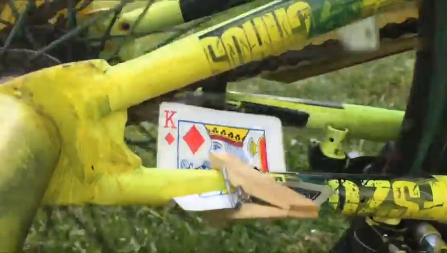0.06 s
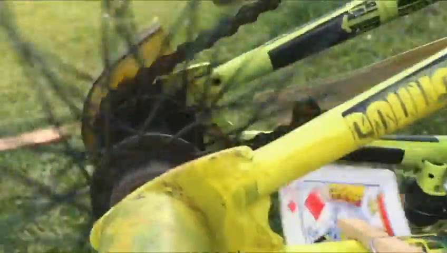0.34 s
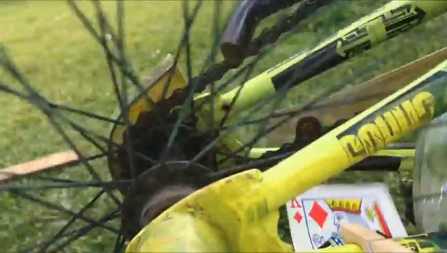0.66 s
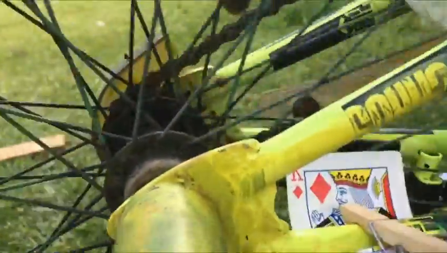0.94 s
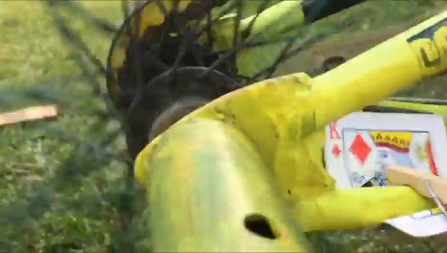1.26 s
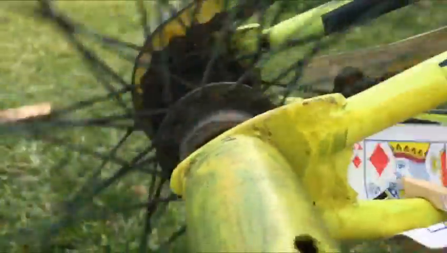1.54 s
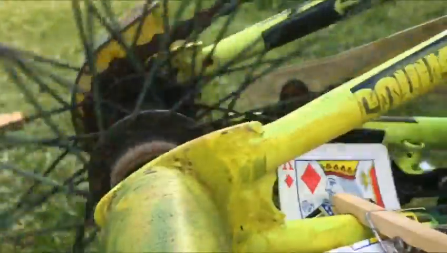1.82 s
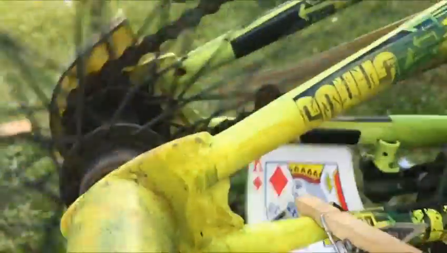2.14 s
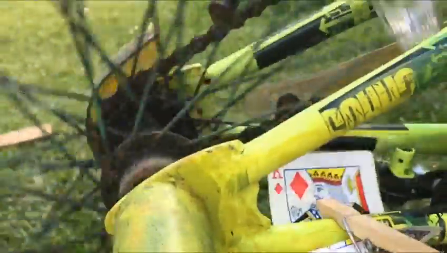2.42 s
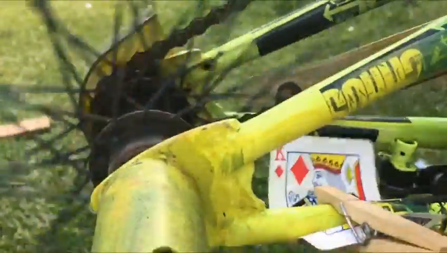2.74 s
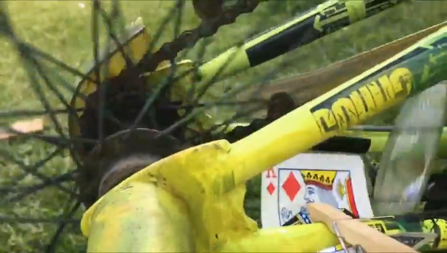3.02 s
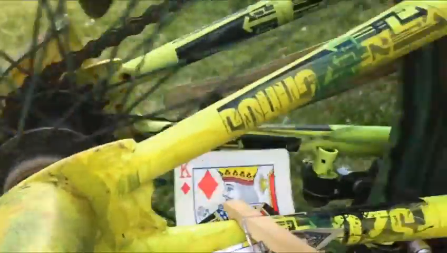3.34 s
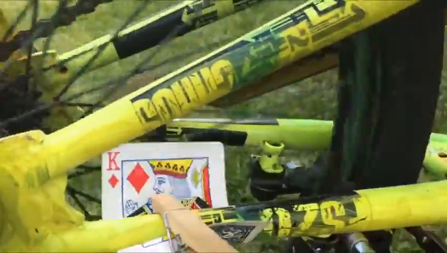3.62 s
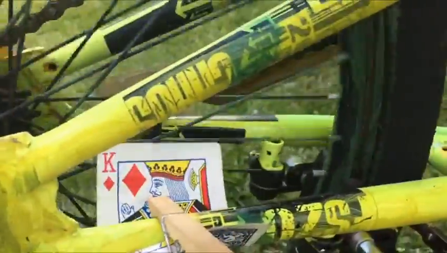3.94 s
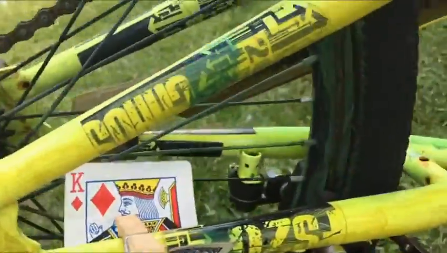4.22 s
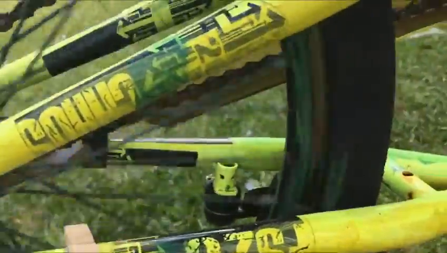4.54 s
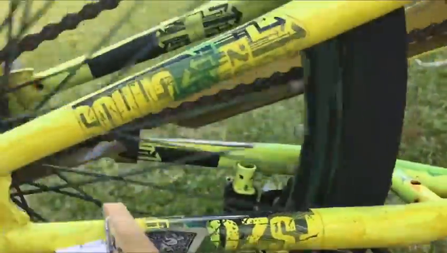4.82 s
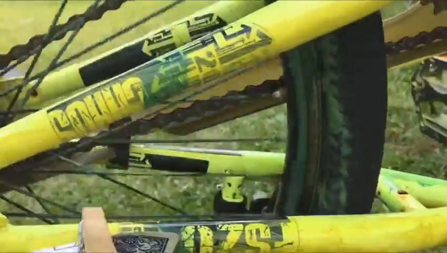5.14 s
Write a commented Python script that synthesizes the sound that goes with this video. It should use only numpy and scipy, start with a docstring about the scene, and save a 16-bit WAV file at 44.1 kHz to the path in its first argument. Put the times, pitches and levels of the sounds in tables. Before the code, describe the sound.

A playing card pegged to a bicycle is slapped by the spokes of the turning wheel, close to the microphone. The crisp clicks speed up, slow to a brief pause, then run again in several surges before slowing to a stop. A few early snaps puff air at the microphone. At the end the drive clanks sharply and the chain ticks and rustles softly over the sprocket. The outdoor background is very quiet.

```python
"""A playing card is pegged to a bicycle on a lawn, and the back wheel is turned in a few pushes.
Each spoke meets the card, scrapes to its edge and lets it snap free; the card flutters for a few swings.
Some early snaps fan a puff of air at the microphone. The wheel rests briefly at one second, turns again,
then slows and stops at about four seconds. Last, the drive clanks, the frame thuds and the chain
creeps over the sprocket (the toothed wheel), link by link."""
import sys
import numpy as np
from scipy import signal
from scipy.fft import rfft, irfft, next_fast_len
from scipy.io import wavfile
from scipy.ndimage import uniform_filter1d

SR = 44100
rng = np.random.default_rng(int(sys.argv[2]) if len(sys.argv) > 2 else 0)


def dump(signal):
    """Clip the signal to [-1, 1] and save it as 16-bit WAV at the path in sys.argv[1]."""
    limited = np.clip(np.atleast_2d(signal).T, -1, 1)
    pcm = np.round(limited * 32767).astype(np.int16)
    wavfile.write(sys.argv[1], SR, pcm)


N = 232444
TIME = np.arange(N) / SR     # seconds since the scene began
AGE = np.arange(4096) / SR   # seconds since one short sound began
FAST_GAP_S, COAST_GAP_S, SLOW_GAP_S = .051, .06, .13   # between spokes: pushed hard, coasting, crawling

# The snaps grow brighter or duller as the hand-held microphone drifts.
# Each row: time in seconds, treble tilt in dB per octave.
BRIGHTNESS = [(.25, 0.24), (.9, -0.5), (1.4, 0.86), (1.9, -0.06), (2.5, -0.07), (2.9, 0.16), (3.2, 0),
              (3.9, -0.7)]
# The card leaves a spoke. Each row: start in seconds, level in dB, ring of the bent card in Hz.
SLAPS = [(0.1695, -9.5, 2830), (0.2461, -2.5, 4640), (0.296, -3, 4330), (0.3391, -4.5, 4300),
         (0.38, -3.5, 4300), (0.4209, -4, 4340), (0.462, -4.5, 4640), (0.5036, -4.5, 4290),
         (0.5549, -4.5, 4470), (0.619, -7, 5300), (0.7004, -9, 3280), (0.7896, -10, 4000),
         (0.9209, -16, 3570), (1.1999, -12, 3730), (1.2892, -4, 6000), (1.3404, -3, 4010),
         (1.3797, -2.5, 3990), (1.4166, -4.5, 3800), (1.4532, -4.5, 4060), (1.4901, -4, 4020),
         (1.5325, -5.5, 3860), (1.5803, -6.5, 4100), (1.6347, -6.5, 2170), (1.6918, -5.5, 3900),
         (1.7564, -5.5, 4450), (1.8311, -5.5, 6000), (1.9062, -5, 4620), (1.9838, -5.5, 4650),
         (2.0699, -8.5, 3050), (2.17, -5.5, 4600), (2.2244, -4, 4530), (2.2652, -3.5, 4320),
         (2.3059, -5, 4570), (2.3509, -6.5, 4660), (2.4007, -6, 2230), (2.452, -6, 2130),
         (2.5073, -5.5, 2230), (2.5681, -5.5, 4670), (2.6282, -5, 4600), (2.6908, -4, 4500),
         (2.7573, -5.5, 4560), (2.825, -5, 4640), (2.8714, -3.5, 4580), (2.9105, -3, 4370),
         (2.9559, -5.5, 4600), (3.009, -6, 4580), (3.0725, -7.5, 3100), (3.1396, -5.5, 2260),
         (3.2183, -8, 3250), (3.3159, -8, 2200), (3.415, -10.5, 3320), (3.5197, -11, 2980),
         (3.6453, -13.5, 3300), (3.7834, -13.5, 2760), (3.932, -14.5, 3230)]

def card_slaps():
    """The card slips off each spoke, snaps and flutters. A slow spoke drags longer and cracks less."""
    out = np.zeros(N)
    for (start, db, ring_hz), gap in zip(SLAPS, spoke_gaps()):
        slow = np.clip((gap - COAST_GAP_S) / (SLOW_GAP_S - COAST_GAP_S), 0, 1)
        fast = np.clip((COAST_GAP_S - gap) / (COAST_GAP_S - FAST_GAP_S), 0, 1)
        doublings = np.log2(COAST_GAP_S / min(gap, SLOW_GAP_S))   # of the coasting speed
        tilt = np.interp(start, *np.transpose(BRIGHTNESS)) + doublings   # faster is brighter
        snap_at = start + .0008 + .0007 * slow
        snap_db = db + 9.5 + 2.75 * slow
        drag_s = .0024 + .0026 * slow
        add(out, snap_at - drag_s, from_db(snap_db - 17.5 + 14 * slow) * slip(drag_s, tilt))
        add(out, snap_at, snap(snap_db, ring_hz, tilt, slow))
        rebound_db = snap_db - 15 + 5.5 * fast + 8 * slow   # a fast spoke throws the card back harder
        add(out, snap_at, flutter(rebound_db, tilt, slow, doublings))
        add(out, snap_at - drag_s / 2, sway())
    return out

def spoke_gaps():
    """Seconds between spokes at each slap."""
    return np.gradient([0] + [row[0] for row in SLAPS])[1:]

# Tone of the slipping edge. Each row: frequency in Hz, relative level in dB.
SLIP_TONE = [(60, -15.5), (450, -15.5), (850, -2.5), (1300, -6.5), (2300, -1), (3800, -0.5), (6000, -19),
             (9000, -14), (10300, -26), (11500, -16.5), (15500, -20.5)]

def slip(drag_s, tilt):
    """The card's edge scrapes off the spoke, growing louder until it lets go."""
    fade_in = np.clip(AGE / .00035, 0, 1)
    fade_out = np.clip((drag_s - AGE) / .00023, 0, 1)
    return colour(grit(fade_in * fade_out * (1 + AGE / drag_s)), SLIP_TONE, tilt / 2)

# Tone of the snap. Each row: frequency in Hz, relative level in dB.
SNAP_TONE = [(60, -14.5), (250, -13.5), (440, -17), (590, -4.5), (780, -3), (1020, -3), (1350, -15),
             (2200, 1), (3200, -3.5), (4500, 1), (6500, -3), (9300, -7), (10300, -15), (11200, -8),
             (15500, -15)]

def snap(db, ring_hz, tilt, slow):
    """The freed card rings and shoves the air; its two corners crack loose a moment apart."""
    body = colour(contact(.00026, .0019), SNAP_TONE, tilt - .49, ring_hz, ring_db=6, width_hz=470)
    corners = np.zeros(len(AGE))
    corners[0] = 1
    add(corners, .00071 * rng.uniform(.4, 1.4), from_db([-8]) * rng.choice([-1, 1]))
    crack = colour(corners, SNAP_TONE, tilt + 3)
    return from_db(db - 1.22) * body + from_db(db - 4 - 10 * slow) * crack + from_db(-37) * shove(.001)

# Tone of the card hitting its peg. Each row: frequency in Hz, relative level in dB.
REBOUND_TONE = [(60, -11.5), (280, 2), (500, -17), (1050, -1.5), (1250, -5), (2300, -2.5), (3200, -4),
                (4300, -0.5), (5000, -6), (9000, -6.5), (10400, -10), (11300, -10.5), (15500, -13.5)]

def flutter(db, tilt, slow, doublings):
    """The card beats against the peg four times, in swings that get shorter and weaker."""
    out = np.zeros(2 * len(AGE))
    swing_s = (.0089 - .0014 * doublings) * rng.normal(1, .025)
    loss_db, ring_db = 10.5 - 3 * slow, 8.5 - 6.1 * slow
    for k in range(4):
        beat = colour(contact(.001, .0016), REBOUND_TONE, tilt / 2, 3810, ring_db, width_hz=290)
        beat_db = db - k * loss_db + min(k, 1) * rng.normal(0, 1.2)
        pushed_air = from_db(-37 - 5 * k) * shove(.0014)
        add(out, swing_s * (k + 1) ** .87, from_db(beat_db) * beat + pushed_air)
    return out

# The ways the card bends. Each row: typical pitch in Hz, level in dB, seconds to fade by 60 dB.
BENDING = [(109, -46.5, 0.12), (147, -44, 0.14), (204, -34.5, 0.043), (290.3, -41.5, 0.11)]

def sway():
    """The whole card bends to and fro, making low tones that die quickly."""
    out = np.zeros(len(AGE))
    for hz, db, fade_s in BENDING:
        out -= ring(hz * rng.normal(1, .055), db - 2, fade_s)
    return out * (1 - np.exp(-AGE / .0056))

# Tone of a spoke meeting the card. Each row: frequency in Hz, relative level in dB.
TOUCH_TONE = [(100, -22), (450, -15), (1100, -12), (2000, 5), (4000, -2), (7000, 3), (9000, -1),
              (10500, -8.5), (14500, -2.5), (16000, -6.5)]
# The spoke pattern repeats in threes. Each row: share of the gap gone by at the touch, level in dB.
LACING = [(.415, -13), (.64, -15.5), (.815, -15.5)]

def spoke_touches(wheel_stops_s=4.095):
    """The next spoke meets the card with a tick; fainter at speed, when the card is still swinging."""
    out = np.zeros(N)
    times = [row[0] for row in SLAPS] + [wheel_stops_s]
    for k, (start, gap) in enumerate(zip(times, np.diff(times))):
        share, db = LACING[k % len(LACING)]
        speed_db = 1 - 3 * np.log2(SLOW_GAP_S / min(gap, SLOW_GAP_S))
        tick = colour(contact(.00075, .0045), TOUCH_TONE, tilt=1)
        add(out, start + share * gap, from_db(db + speed_db) * tick)
    return out

# Air fanned by the card. Each row: start in seconds, level in dB.
PUFFS = [(0.2471, -9.5), (0.296, -34.5), (0.4223, -12.5), (0.4639, -25), (0.506, -27.5), (0.5571, -34),
         (2.2273, -23.5)]

def air_puffs():
    """A puff pops on the microphone, which swings back ever more slowly."""
    out = np.zeros(N)
    half_swings = np.log1p(AGE / .001) / np.log(2.26)   # each lasts 2.26 times the one before
    thump = -np.sin(np.pi * half_swings) * np.exp(-AGE / .011)
    pop = from_db(-3) * shove(.00025)
    for start, db in PUFFS:
        add(out, start, from_db(db) * (thump + pop))
    return out

# Tone of a clank. Each row: frequency in Hz, relative level in dB.
CLANK_TONE = [(60, -21), (300, -4), (750, -14.5), (1100, -8), (2800, -2), (4200, -7), (5200, -14),
              (8000, -14.5), (10500, -17.5), (13000, -26), (16000, -29)]
# Knocks in the drive. Each row: start in seconds, level in dB, treble tilt in dB per octave,
# ring in Hz, decay in seconds.
CLANKS = [(4.445, -22, -2, 2400, 0.019), (4.469, -16, -5.5, 970, 0.0028), (4.546, -18, -2.5, 1400, 0.0088),
          (4.563, 0, 1.5, 2780, 0.0012), (4.596, 2.5, 5.5, 2760, .0014), (4.62, -2, 2.5, 2660, 0.0058),
          (4.627, -2.5, -3, 1000, 0.0032)]

def drive_clanks():
    """The drive knocks as it takes up its slack."""
    out = np.zeros(N)
    for start, db, tilt, ring_hz, decay_s in CLANKS:
        knock = colour(contact(.0003, decay_s), CLANK_TONE, tilt, ring_hz, ring_db=10.5, width_hz=400)
        add(out, start, from_db(db) * knock)
    return out

def frame_thud(start=4.626):
    """The frame gives one dull knock as the chain pulls tight."""
    out = np.zeros(N)
    add(out, start, ring(hz=267, db=-34, fade_s=.035))
    return out

# Tone of a chain link landing. Each row: frequency in Hz, relative level in dB.
LINK_TONE = [(60, -14), (210, 7), (420, -11), (800, -9.5), (1300, 2), (2200, -4.5), (2950, 4), (4500, -12),
             (8500, -10.5), (10500, -17), (13600, -10), (16000, -22)]
# Links settle on the sprocket. Each row: start in seconds, level in dB.
LINKS = [(4.709, -24), (4.762, -15.5), (4.816, -21.5), (4.876, -15), (4.944, -23.5), (5.018, -14.5),
         (5.05, -29)]

def chain_links(bounce_s=.0082, bounce_db=-4):
    """Each link drops on the hollow sprocket and bounces once."""
    out = np.zeros(N)
    for start, db in LINKS:
        tilt = .39 * (-15.5 - db)   # light landings sound thinner
        for delay, touch_db in ((0, 0), (bounce_s, bounce_db)):
            tick = colour(contact(.00015, .008), LINK_TONE, tilt, ring_hz=635, ring_db=19, width_hz=230)
            add(out, start + delay, from_db(db + touch_db) * tick)
    return out

# Plucked spokes. Each row: start in seconds, pitch in Hz, level in dB.
PINGS = [(1.985, 651, -52), (3.521, 662, -48.5), (3.646, 283, -53)]

def spoke_pings():
    """Now and then a plucked spoke rings on faintly."""
    out = np.zeros(N)
    for start, hz, db in PINGS:
        add(out, start, ring(hz, db, fade_s=.4, age=TIME))
    return out

# Tone of the rubbing card. Each row: frequency in Hz, relative level in dB.
RUB_TONE = [(100, -6), (450, -5.5), (800, -2), (2100, -1), (4000, 0), (5000, -4.5), (7200, -6.5),
            (10500, -11), (15000, -11.5)]
# When the wheel turns. Each row: start in seconds, end in seconds.
TURNS = [(0.148, 1.04), (1.189, 4.002)]

def card_rub(fade_db_per_s=203):
    """The card rubs on the spokes: louder as the wheel speeds up, fading away when it rests."""
    doublings = np.interp(TIME, np.array(SLAPS)[:, 0], np.log2(COAST_GAP_S / spoke_gaps()))
    from_turn_s = np.min([np.abs(TIME - np.clip(TIME, start, end)) for start, end in TURNS], axis=0)
    level_db = -49.5 + 3 * doublings - fade_db_per_s * from_turn_s
    return friction(level_db, RUB_TONE, grain_db=4, grain_samples=130)

# Tone of the moving chain. Each row: frequency in Hz, relative level in dB.
CHAIN_TONE = [(100, 1), (400, -16), (1100, -4), (2000, -5), (3100, -0.5), (3700, -9.5), (4400, -1.5),
              (5000, -14), (8500, -8), (10500, -16), (13800, -5), (16000, -7)]
# The chain's rustle swells and fades. Each row: time in seconds, level in dB.
RUSTLE = [(4.45, -84), (4.52, -61), (4.66, -47.5), (4.748, -53.5), (4.878, -51.5), (5.112, -59.5),
          (5.27, -73)]

def chain_rustle():
    """The chain rustles as it creeps over the sprocket."""
    level_db = np.interp(TIME, *np.transpose(RUSTLE), left=-np.inf)
    return friction(level_db, CHAIN_TONE, grain_db=7, grain_samples=70)

def lawn_echo(sound, fade_s=.13, level_db=-20):
    """A weak, dull echo scatters back from the bicycle, the ground and things around."""
    age = TIME[:SR // 2]
    envelope = from_db(-60 * age / fade_s) * (1 - np.exp(-age / .0052))
    tail = colour(rng.standard_normal(len(age)) * envelope, [(100, 4), (1600, 5), (4000, -10), (16000, -7.5)])
    return from_db(level_db) * signal.fftconvolve(sound, tail)[:N]

# Tone of the open air. Each row: frequency in Hz, relative level in dB.
AIR_TONE = [(18, -31.5), (38, -7.5), (118, 0.5), (355, -14.5), (404, -12.5), (473, -14.5), (1130, -13),
            (2170, -22.5), (11700, -36), (16000, -41)]

def open_air(level_db=-66):
    """A faint, steady, low hush lies behind everything."""
    return from_db(level_db) * colour(rng.standard_normal(N), AIR_TONE) * np.sqrt(N)

def friction(level_db, tone, grain_db, grain_samples):
    """Sliding contact: noise that catches and lets go every few milliseconds."""
    catch = unit(uniform_filter1d(rng.standard_normal(N), size=grain_samples)) * np.sqrt(N)
    noise = rng.standard_normal(N) * from_db(grain_db * catch)
    return from_db(level_db) * colour(noise, tone) * np.sqrt(N)

def contact(rise_s, decay_s):
    """A brief, rough touch that rises and dies away."""
    return grit((1 - np.exp(-AGE / rise_s)) * np.exp(-AGE / decay_s))

def grit(envelope):
    """Many tiny contacts whose loudness follows the envelope, evened out from bass to treble."""
    spectrum = rfft(rng.standard_normal(len(AGE)) * envelope)
    smooth = np.sqrt(np.abs(uniform_filter1d(np.abs(spectrum) ** 2, size=160)) + 1e-18)
    gate = np.minimum(envelope / envelope.max() * 20, 1)
    return unit(irfft(spectrum / smooth) * gate)

def shove(width_s):
    """A brief pull and then push of the air."""
    offset = AGE / width_s - 3
    return offset * np.exp(-offset ** 2 / 2)

def ring(hz, db, fade_s, age=AGE):
    """A pure tone that drops by 60 dB in fade_s seconds."""
    return np.sin(2 * np.pi * hz * age) * from_db(db - 60 * age / fade_s)

def colour(sound, tone, tilt=0, ring_hz=1000, ring_db=0, width_hz=300):
    """Shape a sound with a tone table, a treble tilt and one ringing peak; its energy comes out as one."""
    size = 2 * next_fast_len(len(sound) // 2 + 1)
    hz = np.maximum(np.arange(size // 2 + 1) * SR / size, 1)
    points, levels = np.transpose(tone)
    shape_db = np.interp(np.log(hz), np.log(points), levels) + tilt * np.log2(np.maximum(hz, 700))
    shape_db += ring_db / (1 + (2 * (hz - ring_hz) / width_hz) ** 2)
    cepstrum = irfft(np.log(from_db(shape_db)))
    response = np.exp(rfft(2 * cepstrum[:size // 2], size))   # minimum phase: nothing sounds early
    return unit(irfft(rfft(sound, size) * response)[:len(sound)])

def from_db(db):
    """Turn decibels into a multiplier."""
    return 10 ** (np.asarray(db) / 20)

def unit(sound):
    """Scale a sound so its energy is one."""
    return sound / np.sqrt(np.sum(sound ** 2) + 1e-20)

def add(track, start_s, sound):
    """Mix a sound in at a given second."""
    first = max(round(start_s * SR), 0)
    part = track[first:first + len(sound)]
    part += sound[:len(part)]

def scene():
    """Card, wheel and chain close by, in quiet open air; one channel."""
    bicycle = card_slaps() + spoke_touches() + drive_clanks() + frame_thud() + chain_links()
    bicycle += spoke_pings() + card_rub() + chain_rustle()
    return (bicycle + air_puffs() + open_air() + lawn_echo(bicycle))[None]

def record(dry, ceiling=.8, low_cut_hz=38, high_cut_hz=16000):
    """The deepest bass is lost, the sharpest peaks are rounded and the highest treble is cut."""
    thin = signal.sosfilt(signal.butter(3, low_cut_hz, "high", fs=SR, output="sos"), dry)
    rounded = ceiling * np.tanh(thin / ceiling)
    return signal.sosfilt(signal.ellip(10, .2, 80, high_cut_hz, fs=SR, output="sos"), rounded)

dry = scene()
out = record(dry)
dump(out)
```